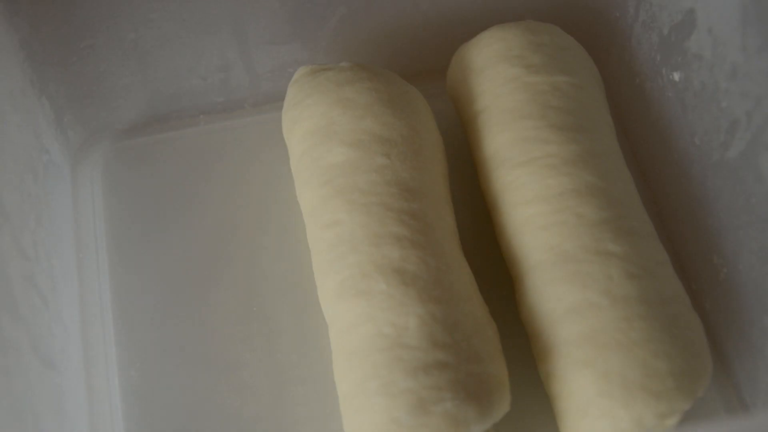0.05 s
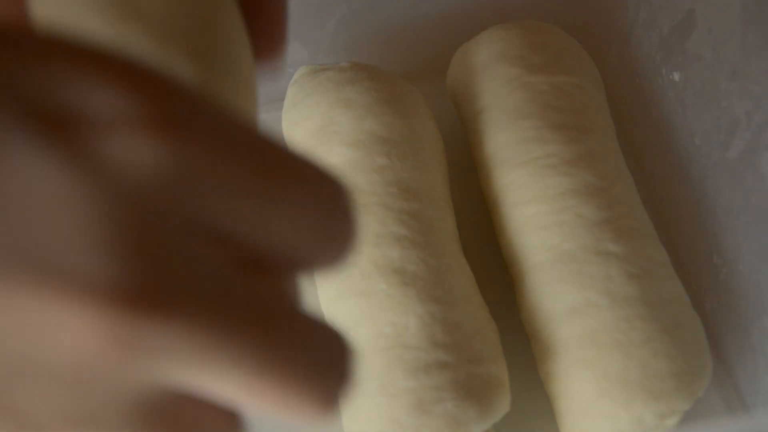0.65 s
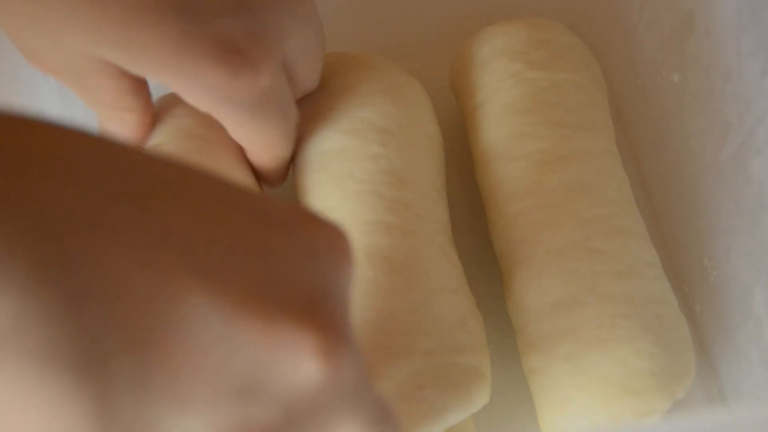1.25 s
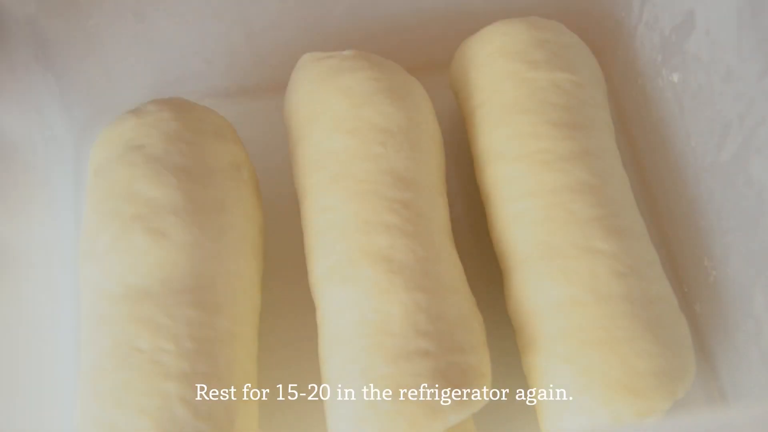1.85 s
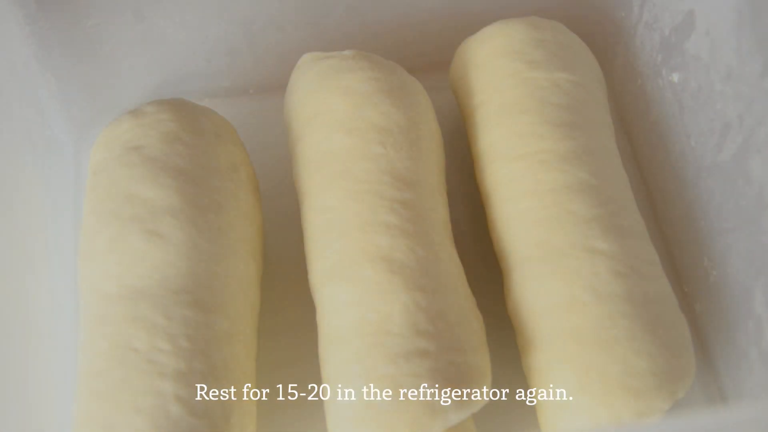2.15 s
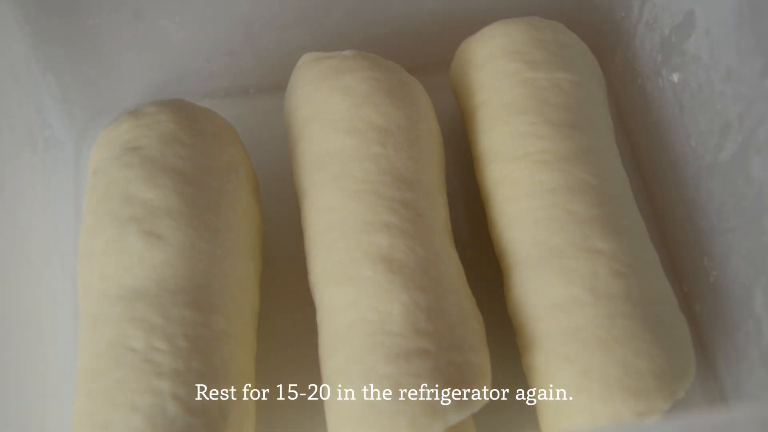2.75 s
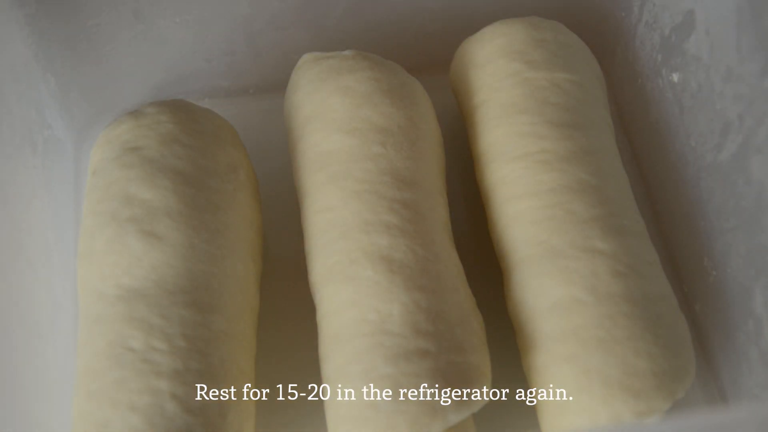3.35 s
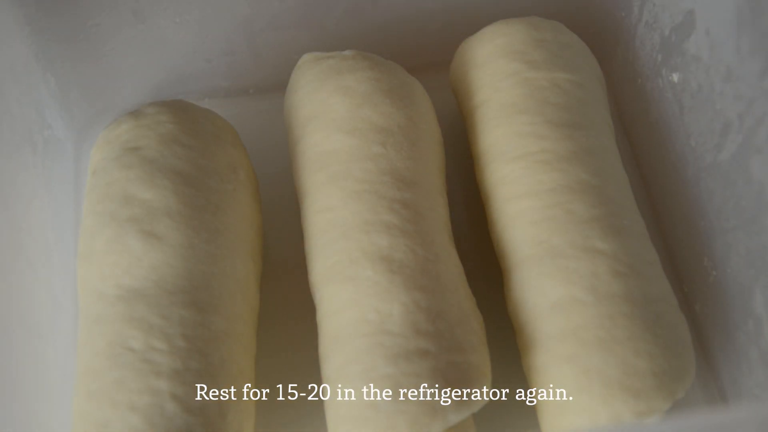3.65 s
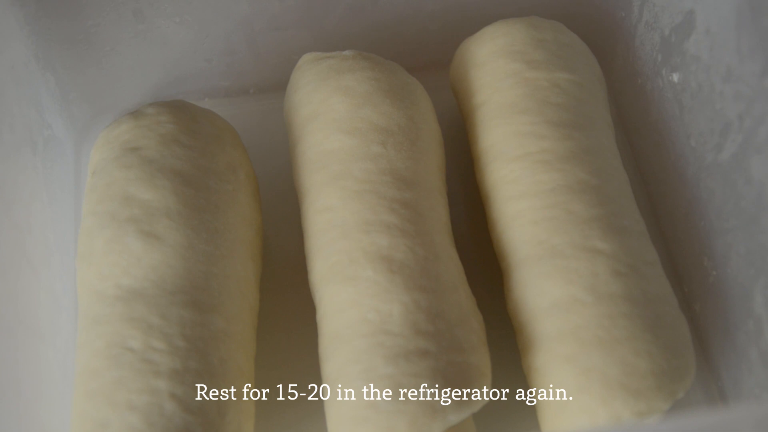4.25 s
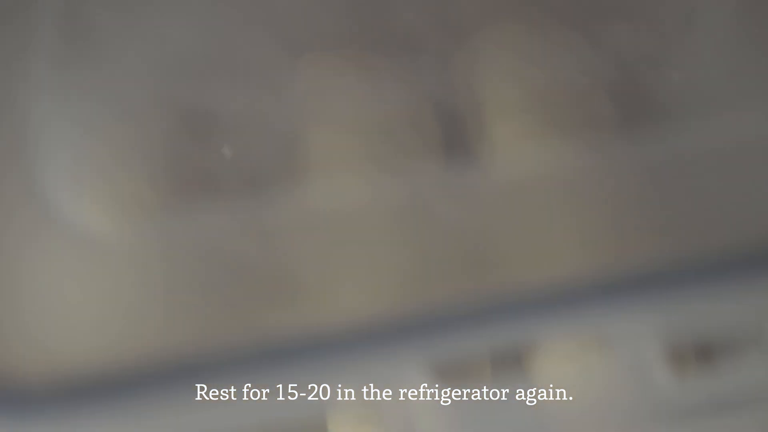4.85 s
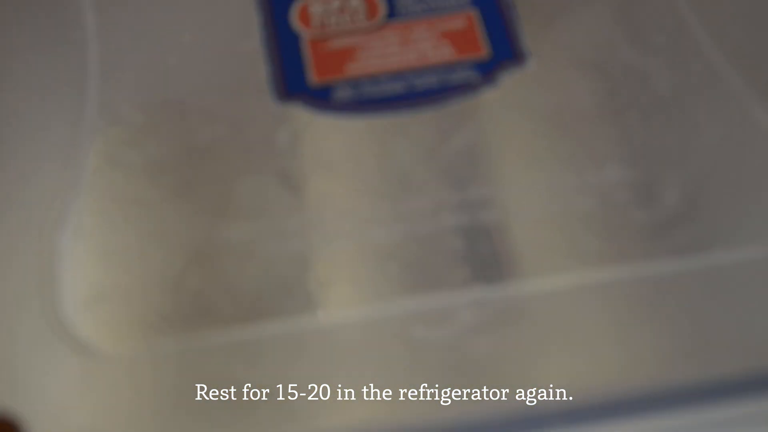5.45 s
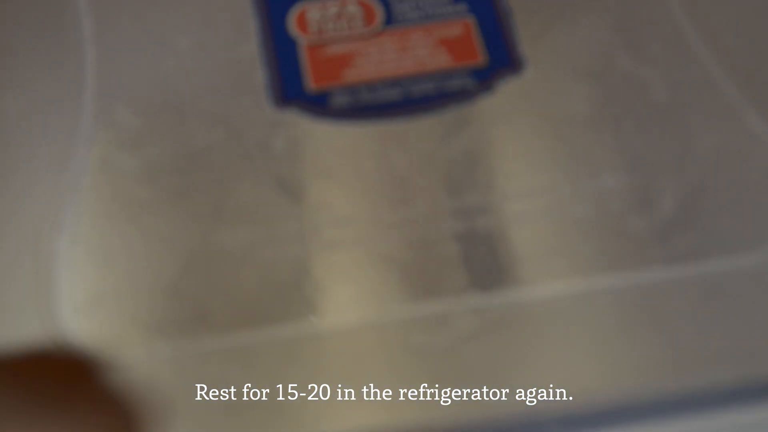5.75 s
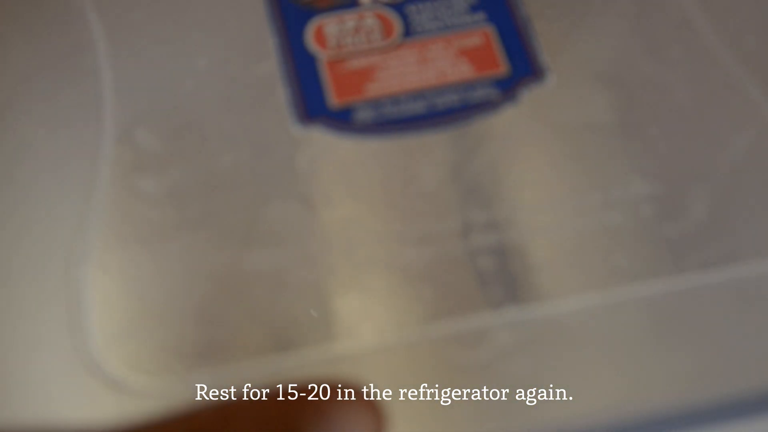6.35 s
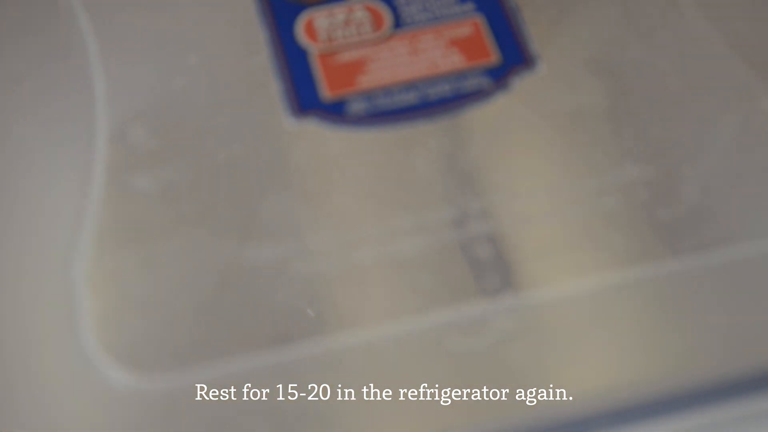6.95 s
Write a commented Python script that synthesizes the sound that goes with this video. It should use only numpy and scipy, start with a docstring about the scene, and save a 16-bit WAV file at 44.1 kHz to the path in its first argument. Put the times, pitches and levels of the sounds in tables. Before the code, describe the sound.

A plastic food box is handled, its lid knocked into place and pressed until the latch snaps shut.

```python
"""Closing a plastic food box

Dough is laid in a box on a kitchen counter, close to the microphone. The lid is picked up with a
stick-slip squeak and a few taps, dropped on the box and pressed down until its latch snaps.
Each blow excites the modes of the box and the patch of wall it strikes. A small room reverberates
over mains hum, and the snap overloads the recorder."""
import sys
import numpy as np
from scipy import signal
from scipy.fft import rfft, irfft, next_fast_len
from scipy.io import wavfile
from scipy.ndimage import uniform_filter1d

SR = 44100
rng = np.random.default_rng(int(sys.argv[2]) if len(sys.argv) > 2 else 0)


def waveform_to_disk(signal):
    """Save audio, clipped to [-1, 1], as 16-bit WAV at the path in sys.argv[1]."""
    frames = np.transpose(np.atleast_2d(signal))
    scaled = np.clip(frames, -1, 1) * 32767
    samples = np.round(scaled).astype(np.int16)
    wavfile.write(sys.argv[1], SR, samples)


N = 308471
TIME = np.arange(N) / SR
AGE = TIME[:SR // 3]  # time since an excitation [s]

# quick catches of the latch as it skids over the rim: (time [s], level [dB])
LATCH_CATCHES = [(6.0621, 22.5), (6.0627, 18), (6.0623, 24)]


def amp(db):
    """Decibels to amplitude ratio."""
    return 10 ** (np.asarray(db) / 20)


def at_hz(points, hz):
    """Interpolate (frequency [Hz], value) points on a logarithmic frequency axis."""
    f, value = np.transpose(points)
    return np.interp(np.log(np.maximum(hz, 1)), np.log(f), value)


def colour(x, gain):
    """Filtering: multiply the spectrum by a function of frequency."""
    size = next_fast_len(x.shape[-1])
    hz = np.arange(size // 2 + 1) * SR / size
    return irfft(rfft(x, size) * gain(hz), size)[..., :x.shape[-1]]


def unit(x):
    """Normalise to rms 1."""
    return x / np.sqrt(np.mean(x ** 2))


def convolve(x, response):
    """A linear system convolves its input with its impulse response."""
    return signal.oaconvolve(x, response)[:len(x)]


def add(track, s, sound):
    """Superpose a sound on a track at time s."""
    start = int(s * SR)
    track[start:start + len(sound)] += sound[:N - start]


def decay(t60, age=AGE):
    """Exponential damping: 60 dB down after t60 seconds."""
    return np.exp(-np.log(1000) * age / t60)


def ring(hz, t60):
    """Impulse response of a damped oscillator, with gain 1 at resonance."""
    rate = np.log(1000) / t60
    return 2 * rate / SR * decay(t60) * np.sin(2 * np.pi * hz * AGE)


def modes(table):
    """Modal superposition: a body's impulse response is the sum of its damped modes."""
    return sum(amp(db) * ring(hz, t60) for hz, db, t60 in table)


def ports(x, lag_s):
    """Path difference: sound from the left reaches the right microphone port later."""
    return np.array([x, colour(x, lambda f: np.exp(-2j * np.pi * f * lag_s))])


def diffuse(size, apart_hz):
    """A diffuse noise field at two close ports: coherent in the bass, incoherent in the treble."""
    mid, side = rng.standard_normal((2, size))
    side_share = lambda f: .5 * f ** 2 / (f ** 2 + apart_hz ** 2)
    mid = colour(mid, lambda f: np.sqrt(1 - side_share(f)))
    side = colour(side, lambda f: np.sqrt(side_share(f)))
    return np.array([mid + side, mid - side])


def background(air_db=-52.5, left_db=0.9):
    """The noise floor: steady broadband noise under the harmonic hum of a mains appliance."""
    # low room noise and microphone hiss: (frequency [Hz], relative level [dB])
    air_spectrum = [(39, -37), (66, -3.5), (76, -9.5), (107, -7.5), (123, -6), (262, -15), (559, -20),
                    (657, -20), (720, -24.5), (948, -24), (2120, -28), (2270, -23), (2550, -27.5),
                    (14600, -30.5), (16000, -34.5)]
    # mains harmonics: (frequency [Hz], level [dB])
    harmonics = [(50, -52), (100, -61.5)]
    air = unit(colour(diffuse(N, apart_hz=1140), lambda f: amp(at_hz(air_spectrum, f))))
    hum = sum(amp(db) * np.sqrt(2) * np.sin(2 * np.pi * (hz * TIME + rng.random()))
              for hz, db in harmonics)
    return (amp(air_db) * air + hum) * amp([[left_db], [-left_db]])


def kitchen(x, first_s=0.0013, build_s=0.0018):
    """Reverberation: dense reflections from counter and walls decay at their own rate in each octave."""
    # spectrum of the reflections: (frequency [Hz], gain [dB])
    room_spectrum = [(60, 3.5), (200, -6.5), (500, -5), (1200, -1), (2300, -4.5), (3100, -5), (5000, -3),
                     (8000, -1.5), (15000, -3.5)]
    # reverberation time: (frequency [Hz], t60 [s])
    room_t60 = [(150, 0.28), (700, 0.2), (2000, 0.24), (6000, 0.27), (14000, 0.11)]
    noise, tail = diffuse(len(AGE), apart_hz=1430), 0
    centres = np.geomspace(62.5, 16000, 9)
    for hz, weights in zip(centres, np.eye(len(centres))):
        octave = np.c_[centres, weights]
        band = colour(noise, lambda f: at_hz(octave, f) * amp(at_hz(room_spectrum, f)))
        rate = np.log(1000) / at_hz(room_t60, hz)
        tail = tail + band * np.exp(-rate * AGE) * np.sqrt(2 * rate / SR)  # envelope of unit energy
    tail = tail * np.clip((AGE - first_s) / build_s, 0, 1)
    return np.array([convolve(x, side) for side in tail])


def rubs(grain_db=3.4, grain_samples=70):
    """Sliding friction: dense, uneven micro-slips make a dull scrape under a dry hiss."""
    # fingers and plastic sliding: (peak time [s], half length [s], scrape level [dB], hiss level [dB])
    slides = [(0.795, 0.019, -43.5, -53), (1.09, 0.15, -57.5, -58.5), (1.37, 0.035, -63, -58.5),
              (1.782, 0.028, -48.5, -58.5), (2.588, 0.016, -45, -55), (2.675, 0.033, -43.5, -42.5),
              (2.767, 0.018, -45.5, -54), (3.828, .018, -59, -50.5), (4.077, 0.03, -45.5, -53),
              (4.118, 0.019, -42.5, -54), (4.962, .025, -42.5, -48), (5.16, 0.017, -41.5, -48.5),
              (5.36, 0.048, -53.5, -62), (5.861, 0.041, -47.5, -46), (6.71, 0.014, -54.5, -62)]
    # friction spectra of scrape and hiss: (frequency [Hz], relative level [dB])
    scrape_spectrum = [(120, -46), (200, 1.5), (507, -2.5), (857, -6), (1170, -7.5), (1550, -13.5),
                       (1820, -9.5), (2620, -21.5), (5000, -25), (6500, -41.5), (11000, -120)]
    hiss_spectrum = [(1500, 1), (4000, 2.5), (8000, -2.5), (12500, 3.5), (16000, -1)]
    peak_s, half_s, scrape_db, hiss_db = np.transpose(slides)
    when = TIME[::grain_samples, None]
    roughness = amp(grain_db * rng.standard_normal((len(when), 1)))
    strokes = (1 + ((when - peak_s) / half_s) ** 2) ** -1.5 * roughness
    sound = 0
    for db, spectrum in ((scrape_db, scrape_spectrum), (hiss_db, hiss_spectrum)):
        slips = unit(colour(rng.standard_normal(N), lambda f: amp(at_hz(spectrum, f))))
        sound = sound + slips * np.repeat(strokes @ amp(db), grain_samples)[:N]
    return sound


def seal_drags(ring_t60=0.045, fade_s=0.0074):
    """Forced resonance: tiny random slips of the seal keep one panel of the lid humming."""
    # the seal dragging along the rim: (start [s], end [s], resonance [Hz], level [dB])
    drags = [(5.272, 5.423, 412, -45), (5.549, 5.573, 317, -41)]
    sound = np.zeros(N)
    for start, end, hz, db in drags:
        contact = np.clip(np.minimum(AGE, end - start - AGE) / fade_s, 0, 1)
        panel = unit(convolve(rng.standard_normal(len(AGE)), ring(hz, ring_t60)))
        add(sound, start, amp(db) * contact * panel)
    return sound


def squeak(start_s=2.644, db=-28.5, creep_hz=4830, slide_hz=8630, jitter=0.0535):
    """Stick-slip on the lid: the uneven rate climbs as a finger creeps, breaks free and slides."""
    creep_s, break_s = .0205, .004
    attack_s, hold_s, release_t60 = 0.0055, 0.027, 0.058
    age = np.maximum(TIME - start_s, 0)
    speed = (1 + np.tanh((age - creep_s) / (2 * break_s))) / 2
    waver = unit(uniform_filter1d(rng.standard_normal(N), size=24))
    slip_hz = (creep_hz + (slide_hz - creep_hz) * speed) * (1 + jitter * waver)
    grip = np.minimum(age / attack_s, 1) * decay(release_t60, np.maximum(age - hold_s, 0))
    return amp(db) * grip * np.sin(2 * np.pi * np.cumsum(slip_hz) / SR)


def push(corner_hz):
    """Compliant impact: a force pulse of unit area, longer and duller the softer the contact."""
    age = AGE[:SR // 30]
    force = age * np.exp(-2 * np.pi * corner_hz * age)
    return force / force.sum()


def tick(edge_hz=7000):
    """Hard impact: an edge meets plastic in a pulse a few samples long, hence broad in spectrum."""
    click = np.exp(-2 * np.pi * edge_hz * AGE[:SR // 30])
    return click / click.sum()


def chatter(db=-4, spread_s=0.0029, above_hz=700):
    """Contact chatter: an impulse, then the brief buzz of a loose wall against its support."""
    age = AGE[:SR // 30]
    buzz = rng.standard_normal(len(age)) * np.exp(-age / spread_s)
    buzz = amp(db) * buzz / np.linalg.norm(buzz)
    highpass = signal.butter(1, above_hz, "high", fs=SR)
    return signal.unit_impulse(len(age)) + signal.lfilter(*highpass, buzz)


def knocks(patch_cycles=11, baffle_hz=98, direct_db=-2.0, held_t60=.45):
    """Impact excitation: each blow radiates directly, rings the struck wall and drives the box's modes."""
    # the dough lands; the lid is lifted, dropped and seated; the latch shuts and the box settles:
    # (time [s], strength [dB], contact corner [Hz], patch resonance [Hz], patch ring [dB], tick [dB],
    # weight [dB], bending resonance [Hz]); ring, tick and weight are relative to the strength
    blows = [ (0.7913, 8.5, 720, 950, -3, -47, .5, 144), (1.798, -2.5, 172, 140, 17.5, -46, -24, 204),
             (2.7598, -10.5, 555, 1180, 16.5, -10, 4, 321), (3.2463, 1, 3400, 445, 13, -8, -6.5, 190),
             (3.2983, 3, 982, 165, 10.5, -13, -17, 295), (3.4099, -4.5, 650, 1220, 17.5, -26, 7.5, 298),
             (3.6976, 6, 680, 800, -2, -28, -14, 200), (4.1341, 6, 430, 161, 13.5, -52, -8.5, 165),
             (4.8587, 29.5, 640, 2170, -14, -50, -13, 590), (4.9438, 1.5, 2600, 550, 15, -16, -14.5, 290),
             (4.961, 7, 1000, 565, 10, -36, -9, 221), (4.9908, 0.5, 1500, 1628, -7, -24, -3, 202),
             (5.0446, 20.5, 1570, 434, 13.5, -21, -16.5, 415), (5.0447, -8, 900, 3070, 22, -7, -15, 430),
             (5.0772, -4, 1560, 157, 26.5, -7, -11.5, 445), (5.1346, -5, 615, 158, 27, -36, -6.5, 149),
             (5.3995, 13, 750, 323, 24, -45, 0.5, 393), (5.4083, 22.5, 1340, 320, 15.5, -19.5, -6, 131),
             (5.6364, 14.5, 180, 337, 18.5, -32, 6.5, 220), (5.8356, -2, 2020, 253, 24.5, -26, 7.5, 136),
             (5.8706, -21, 3000, 270, 23, -2, -10, 200), (6.057, 10, 150, 255, 23, -50, -15, 200),
             (6.0634, 26.5, 490, 159, 25.5, -49, 5.5, 222), (6.077, 29, 320, 150, 15, -55, -8, 279),
             (6.1812, 30.5, 105, 161, 0.5, -58, -35, 200), (6.1857, 12, 900, 263, 22, -15, 1, 275)]
    # modes of the box with its lid: (frequency [Hz], gain [dB], t60 before hand damping [s])
    box_modes = [(149.5, 1.5, 0.41), (217, 7.5, 0.22), (286, 6.5, 0.082), (418, -10, 0.13),
                 (580.2, 2.5, 0.11), (659, 1.5, 0.083), (783, 2, 0.33), (1030, -1, 0.057),
                 (1150, -7, 0.087), (1496, -16, 0.18), (1540, -18, 0.16), (1850, -15, .07),
                 (2350, 6, 0.052), (2954, 4, 0.018)]
    # the weight arrives just after the edge, through soft flesh, and bends the wall
    weight_lag_s, weight_corner_hz, bend_db = .0052, 348, 17
    # the box then rebounds once, with a softer contact still
    rebound_lag_s, rebound_db, rebound_corner_hz = .0189, 1, 233
    force, local = np.zeros((2, N))
    for s, db, corner_hz, patch_hz, ring_db, tick_db, weight_db, bend_hz in blows:
        strength, weight = amp(db), amp(db + weight_db)
        edge = strength * (push(corner_hz) + amp(tick_db) * tick())
        load = weight * push(weight_corner_hz)
        rebound = weight * amp(rebound_db) * push(rebound_corner_hz)
        for lag_s, pulse in ((0, edge), (weight_lag_s, load), (rebound_lag_s, rebound)):
            add(force, s + lag_s, pulse)
            add(local, s + lag_s, amp(direct_db) * signal.fftconvolve(pulse, chatter()))
        add(local, s, strength * amp(ring_db) * ring(patch_hz, patch_cycles / patch_hz))
        add(local, s + weight_lag_s, weight * amp(bend_db) * ring(bend_hz, patch_cycles / bend_hz))
    body = convolve(force, modes(box_modes) * decay(held_t60))  # hands damp the plastic
    # a small box radiates little deep bass
    radiation = signal.butter(2, baffle_hz, "high", fs=SR, output="sos")
    return -signal.sosfilt(radiation, local + body)


def latch_rattle(db=-20, t60=0.3):
    """Rattling contact: the snapped flap shivers against the rim in a bright, decaying wash."""
    # spectrum of the shiver: (frequency [Hz], relative level [dB])
    shiver_spectrum = [(500, -3), (1800, 6), (3200, -9.5), (5000, -6.5), (7000, -1), (10000, -3.5),
                       (16000, -15)]
    wash = colour(diffuse(len(AGE), apart_hz=1700), lambda f: amp(at_hz(shiver_spectrum, f)))
    sound = amp(db) * unit(wash) * decay(t60)
    start = int(LATCH_CATCHES[0][0] * SR)
    return np.pad(sound, ((0, 0), (start, N - start - len(AGE))))


def latch():
    """Free vibration: the flap jumps over the rim and rings briefly after each catch."""
    # modes of the stiff flap: (frequency [Hz], gain [dB], t60 [s])
    flap_modes = [(1700, 1, 0.017), (2330, -4.5, 0.0059), (4550, -1.5, 0.0028), (6460, 4.5, 0.0049),
                  (8600, 4.5, 0.0026), (11140, 0.5, 0.0037)]
    force = np.zeros(N)
    for s, db in LATCH_CATCHES:
        add(force, s, amp(db) * tick(edge_hz=3400))
    return convolve(force, modes(flap_modes))


def scene(left_db=0.95, box_room_db=-.8, lid_room_db=1.8, latch_room_db=-11, lid_direct_db=-0.76):
    """Superposition: direct and reverberant sound add, in a different ratio for box, lid and latch."""
    handling = knocks() + rubs() + seal_drags() + squeak()
    snap = latch()  # sharp and nearly dry, with little room sound
    # the box stands a little to the left; the lid is first handled further left and further off
    lid = handling * ((TIME > 2.4) & (TIME < 4.5))
    box = handling - lid
    direct = ports(box + snap, lag_s=.000028) + amp(lid_direct_db) * ports(lid, lag_s=.00011)
    room = kitchen(amp(box_room_db) * box + amp(lid_room_db) * lid + amp(latch_room_db) * snap)
    return (direct + room + latch_rattle()) * amp([[left_db], [-left_db]]) + background()


def record(dry, soft_top_hz=16000, cutoff_hz=16300):
    """Band limiting and overload: the microphone dulls the top; the recorder clips, then low-passes."""
    heard = colour(dry, lambda f: 1 / np.sqrt(1 + (f / soft_top_hz) ** 10))
    lowpass = signal.ellip(8, .2, 70, cutoff_hz, fs=SR, output="sos")
    return signal.sosfilt(lowpass, np.clip(heard, -1, 1))


dry = scene()
out = record(dry)
waveform_to_disk(out)
```